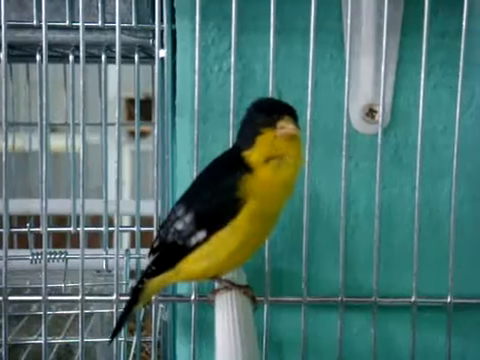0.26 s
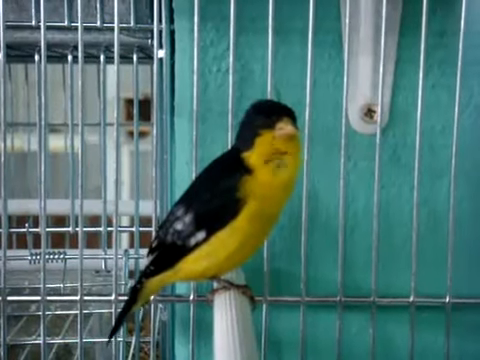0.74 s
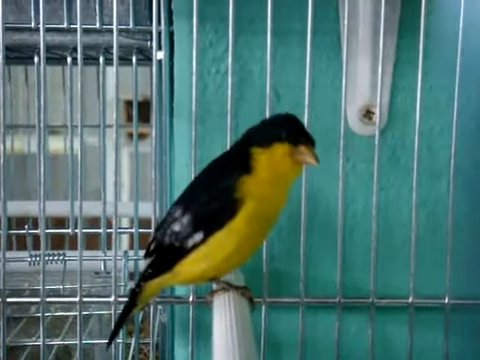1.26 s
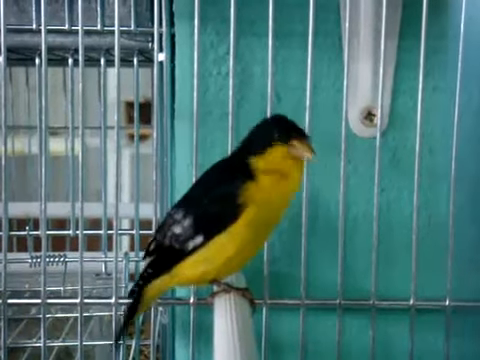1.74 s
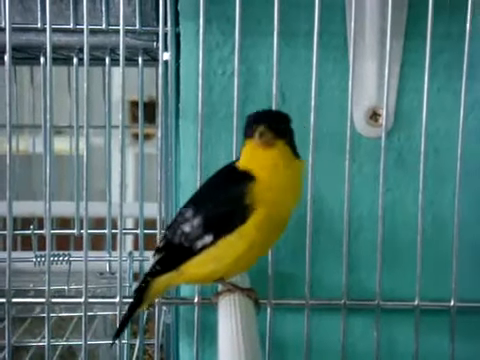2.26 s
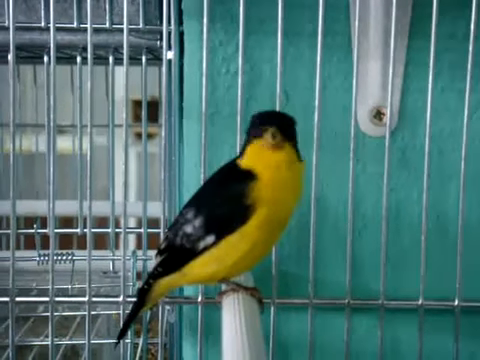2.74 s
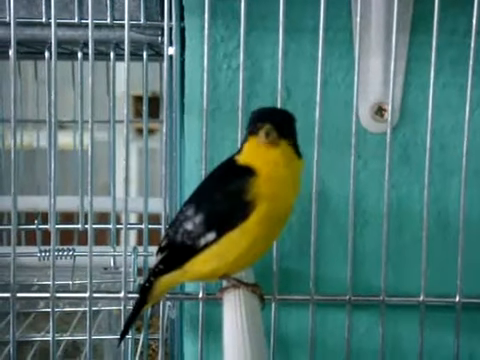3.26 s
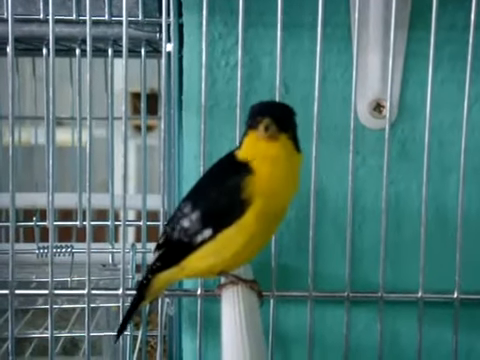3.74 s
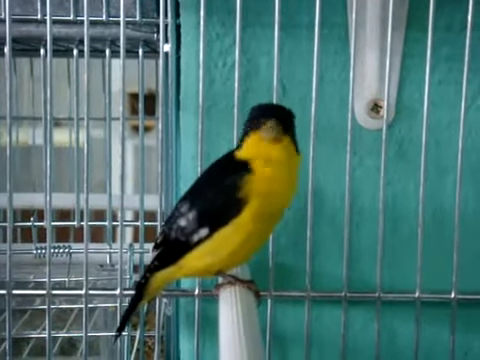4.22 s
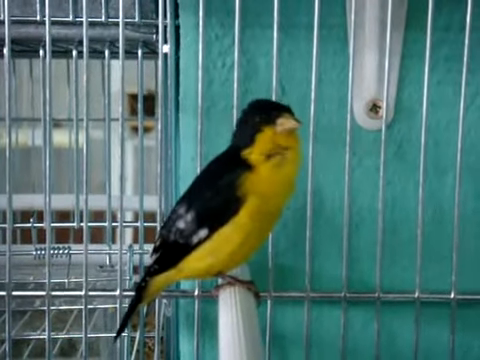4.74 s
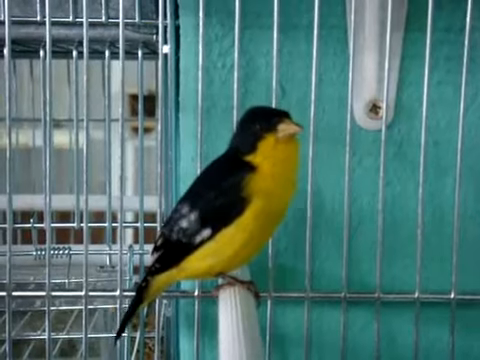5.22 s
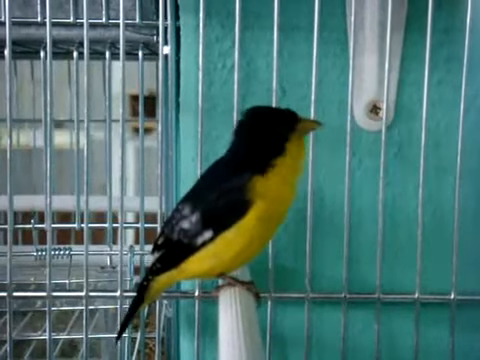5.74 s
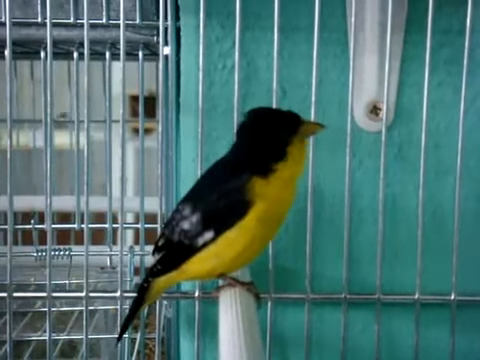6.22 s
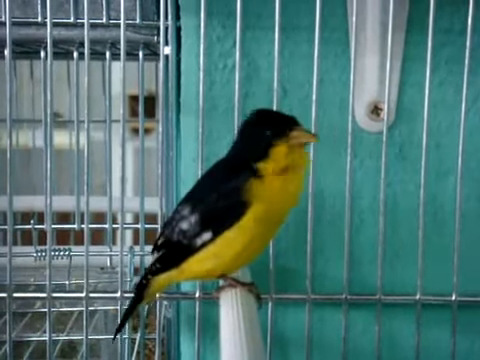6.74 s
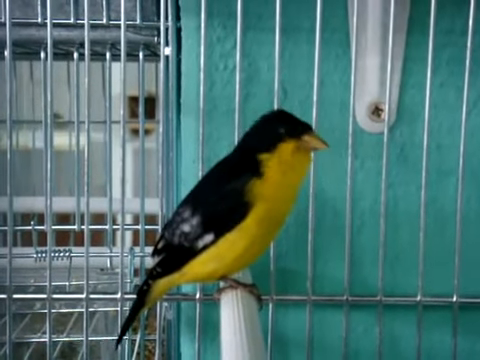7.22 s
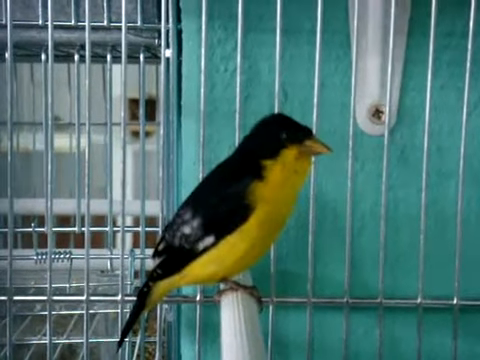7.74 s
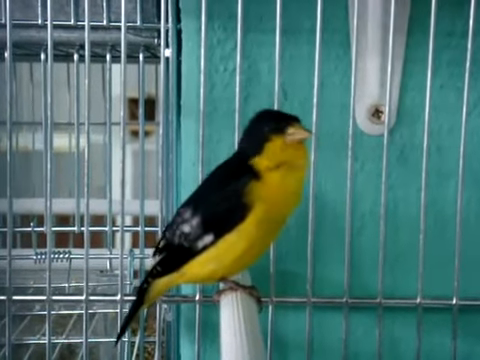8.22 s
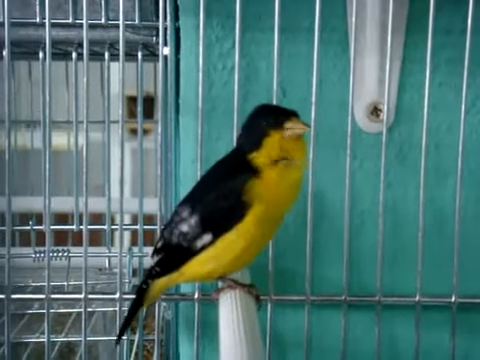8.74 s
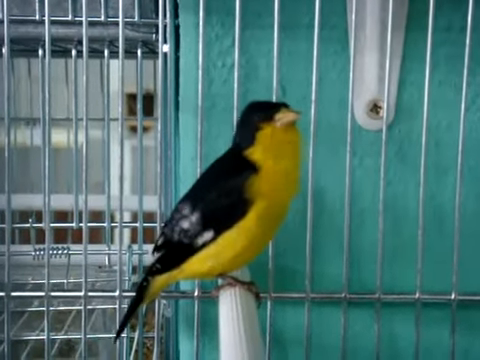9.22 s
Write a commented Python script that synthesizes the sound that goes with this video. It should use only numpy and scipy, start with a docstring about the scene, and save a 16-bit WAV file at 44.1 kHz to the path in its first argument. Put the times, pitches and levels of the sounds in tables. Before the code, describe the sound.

Indoors, a small finch sings very near and fairly dry, its loudest notes slightly overloaded. A busy first second gives way to isolated phrases around two, four and seven seconds, then a last cluster of chips and descending whistles after eight. Other birds answer faintly as reverberant tweets and trills, over uneven soft noise and a low hum.

```python
"""A caged goldfinch twitters close by: pure glides, quick flicks and two-voiced notes from the two sides of its syrinx.
Each note is a pitch curve driving a few harmonics, whose strengths follow a tone weighting.
Other birds call and trill from further off, heard mostly as the diffuse echo of a hard, ringing room.
Under them lie a steady-pitched hum and a wash of filtered noise; this background sinks and swells.
The loudest notes overload the microphone, which flattens their peaks."""
import sys
import numpy as np
from scipy import signal
from scipy.fft import rfft, irfft
from scipy.io import wavfile
from scipy.ndimage import uniform_filter1d, map_coordinates

SR = 44100
rng = np.random.default_rng(int(sys.argv[2]) if len(sys.argv) > 2 else 0)


def dump(signal):
    """Clip the signal to [-1, 1] and save it as 16-bit WAV at the path in sys.argv[1]."""
    limited = np.clip(np.atleast_2d(signal).T, -1, 1)
    pcm = np.round(limited * 32767).astype(np.int16)
    wavfile.write(sys.argv[1], SR, pcm)


N = 418068

# Levels are relative: fades, the room and the background swell act on them later.
# tone weighting of the bird voices, with the treble cut steeply above 9 kHz: f/Hz, gain/dB
VOICE_WEIGHTING = [(1400, -29), (2100, -24), (3000, -0.5), (4500, 2.5), (5800, 7.5), (7000, -3), (9000, -5),
                   (11000, -68)]
# stretches in which the close voice turns harsh: start t/s, end t/s, roughness (0 to 1)
HARSH = [(4.38, 4.43, .3), (8.68, 8.725, .3), (8.935, 8.99, .3), (9.245, 9.34, .22)]
# whistles that fall and settle; short overlaps join the parts of one whistle, rows sounding together
# are two voices: start t/s, end t/s, first f/Hz, last f/Hz, level/dB, fade/dB
WHISTLES = [(0, 0.095, 6060, 5610, -7.5, 10), (0.076, 0.206, 5730, 4170, -10, -1.5),
            (1.984, 2.208, 3990, 3850, -11, 11.5), (4.644, 4.691, 4190, 3880, -9, 7),
            (4.715, 4.773, 4820, 4430, -10, 14), (4.77, 5.047, 4070, 3680, -12.5, 10.5),
            (8.293, 8.361, 4130, 3847, -9, -13.5), (8.361, 8.453, 5200, 4530, -12, 8),
            (8.385, 8.515, 4470, 3220, -12.5, 0), (8.748, 8.862, 5160, 4370, -7, 11.5),
            (9.012, 9.118, 5080, 4360, -9.5, 6), (9.285, 9.322, 4900, 3390, -10, -8),
            (9.26, 9.332, 2687, 1780, -15, 7)]
SETTLE_POWER = 2.2  # the pitch falls fast at first, then flattens
# slurs that hold their pitch, then plunge: start t/s, end t/s, first f/Hz, last f/Hz, level/dB
SLURS = [(0.413, 0.469, 5970, 3040, -6), (0.556, .615, 5880, 2830, -6.5), (2.709, 2.755, 3810, 2070, -11)]
PLUNGE_POWER, SLUR_FADE_DB = 3.0, 7
# notes with a curved pitch: start t/s, end t/s, first f/Hz, middle f/Hz, last f/Hz, level/dB
BENDS = [(0.281, 0.313, 1440, 1723, 1460, -14.5), (0.365, .385, 3460, 2170, 3820, -14.5),
         (.506, 0.528, 3900, 2320, 4030, -17), (1.959, 1.978, 4050, 5380, 5470, -6),
         (4.626, 4.716, 4200, 4870, 4600, -15), (6.093, 6.195, 2880, 3513, 3870, -13.5),
         (9.257, 9.335, 2890, 3150, 2706, -13)]
# straight fast sweeps: start t/s, end t/s, first f/Hz, last f/Hz, level/dB
FLICKS = [(0.384, 0.4, 5560, 3660, -19), (0.4, 0.41, 5430, 3430, -17.5), (0.53, 0.534, 4960, 2590, -14),
          (0.542, 0.554, 3970, 3050, -18), (2.702, 2.712, 4410, 2130, -8.5), (7.38, 7.41, 1600, 930, -17),
          (9.25, 9.262, 2840, 5800, -15.5)]
# the long nasal call: t/s, f/Hz, level/dB
NASAL_CALL = [(3.732, 1260, -6.5), (3.75, 1700, -5.5), (3.768, 1745, -5), (3.8, 1457, -15),
              (3.84, 1430, -15), (3.88, 1256, -16)]
# both sides of the syrinx slide down together:
# start t/s, end t/s, upper voice f/Hz, interval f/Hz, level/dB, fade/dB
DUETS = [(1.895, 1.951, 5426, 700, -7.5, 17), (6.872, 6.976, 5670, 968, -6, 8),
         (7.035, 7.167, 5490, 1027, -11.5, 0.5)]
# pitch of the upper voice through the note: ratio
DUET_FALL = [0.99, 0.99, 0.96, .84, .8]
# distance of the lower voice below the upper through the note: share of the interval
DUET_SPREAD = [.7, 1.05, 0.93]
# a wave, then a climb that snaps back:
# start t/s, turn t/s, end t/s, crest f/Hz, top f/Hz, wave level/dB, climb level/dB
WARBLES = [(.656, .756, .818, 3090, 4870, -19, -7.5), (0.914, .998, 1.052, 3290, 4520, -13, -8)]
# pitch through the wave: share of the crest
WAVE = [.54, 0.99, .915, 0.702, .76]
# pitch through the climb: share of the top
CLIMB = [.6, .68, .75, .89, 1]
WAVE_FADE_DB = 7.5
LEGATO_S = 0.0074  # the wave runs on a little under the climb
SNAP_S, SNAP_HZ, SNAP_DB = 0.008, 2640, -5.5  # the drop at the end; level against the climb
# the second voice sweeps up as each warble begins
LEAD_IN_HZ, LEAD_IN_S, LEAD_IN_EARLY_S, LEAD_IN_DB, LEAD_IN_FADE_DB = [3030, 4540, 5460], 0.029, 0.0046, -17, 22
# harsh chips of several short sweeps: start t/s, end t/s, arch f/Hz, level/dB
CHIPS = [(4.384, 4.434, 3900, -12), (8.684, 8.724, 3620, -6), (8.94, 8.992, 3380, -14.5)]
# both voices sweep up, then one arches and the other drops:
# start and end (shares of the chip), pitches (ratios to the arch), level/dB against the chip
CHIP_PARTS = [(0, 0.5, [1.03, 1.36], 1.5), (0, 0.6, [1.36, 1.7], -1), (.28, .84, [.74, 1, 0.802], -0.5),
              (.62, 0.86, [1.5, .85], 1)]
BOW_DB = 3  # a close note is this much louder in its middle than at its ends, before any fade
REEDY_DB, PURE_DB = -17.5, -20.5  # overtones of close notes at 2800 Hz and at 4000 Hz, per octave
# distant tweets that rise, then drop at the end: start t/s, end t/s, reference f/Hz, level/dB
TWEETS = [(2.594, 2.715, 6570, -21), (3.149, 3.302, 6505, -23.5), (3.838, 3.955, 6370, -18.5),
          (3.947, 4.061, 8320, -24.5), (4.316, 4.39, 6330, -18.5), (5.171, 5.245, 6290, -19.5),
          (5.599, 5.713, 8270, -23.5), (6.021, 6.091, 6260, -19.5), (7.318, 7.394, 6444, -17.5),
          (7.776, 7.915, 8210, -21.5), (8.248, 8.325, 6270, -16.5), (8.842, 8.967, 6405, -21.5)]
# pitch through a tweet: share of the reference
TWEET = [.53, .82, 0.98, .6]
# distant whistles on straight glides: start t/s, end t/s, first f/Hz, last f/Hz, level/dB
FAR_WHISTLES = [(.85, 0.91, 4110, 5260, -22.5), (1.78, 2.366, 4337, 4447, -33.5),
                (2.754, 2.852, 4850, 3680, -22), (4.558, 4.62, 4016, 4010, -24.5),
                (5.035, 5.18, 3922, 3743, -18), (5.3, 5.805, 3662, 3577, -24.5),
                (5.03, 5.136, 1300, 1550, -46), (5.81, 6.457, 3602, 3187, -27.5),
                (6.492, 6.562, 2450, 3750, -25), (6.958, 7.034, 8740, 4320, -26),
                (7.67, 7.8, 3370, 2794, -44), (8.138, 8.2, 4350, 5830, -24.5)]
# distant thin high ticks, all the same short drop: start t/s
TICKS = [2.68, 6.228, 7.282, 8.13]
TICK_HZ, TICK_S, TICK_DB = [8900, 7000], 0.026, -25.5
# one long, drawn-out distant slur: t/s, f/Hz, level/dB
FAR_SLUR = [(2.911, 3386, -30), (3.0, 4173, -26.5), (3.045, 5370, -18), (3.1, 5830, -16.5),
            (3.2, 5905, -32.5), (3.35, 6060, -23), (3.432, 3760, -18.5)]
# distant buzzy trills and two low, blurred whistles (near 1.3 and 2 kHz):
# start t/s, end t/s, first f/Hz, last f/Hz, pitch swing f/Hz, level/dB
FAR_MODULATED = [(1.325, 1.607, 5470, 4900, 564, -24.5), (1.501, 1.723, 1344, 1298, 30.7, -28.5),
                 (1.583, 1.673, 4387, 4263, 1140, -21.5), (2.475, 2.734, 1974, 1955, 168, -31.5),
                 (5.781, 5.82, 4800, 3850, 1240, -20), (5.938, 6.002, 4244, 4140, 1210, -20),
                 (7.793, 7.915, 5480, 4600, 660, -29.5), (9.32, 9.502, 4047, 3620, 826, -25.5)]
# spectrum of the background noise, with the treble cut steeply near 10 kHz: f/Hz, relative level/dB
NOISE_SPECTRUM = [(30, -21), (110, -15), (180, -5), (450, 0), (1100, -7), (1900, -7), (3000, 11),
                  (5500, -3.5), (9800, -13.5), (10500, -67)]
# hum lines: f/Hz, relative level/dB
HUM = [(199.2, -50.5), (403.7, -55.5), (506.0, -52)]
# course of the background: t/s, level/dB, taken against the usual level below
BACKGROUND = [(0.03, -50.5), (0.29, -48), (1.08, -47.5), (1.34, -40), (2.18, -48), (2.47, -38.5),
              (3.2, -44), (4.62, -41.5), (4.88, -47.5), (5.57, -42.5), (6.19, -47), (7.01, -37),
              (7.14, -44.5), (8.16, -37.5), (8.45, -47.5), (8.69, -39), (8.82, -54), (9.45, -40)]
USUAL_BACKGROUND_DB = -43.5
CUTOFF_HZ = 16000


def goldfinch():
    """Syllables superpose: the close song is the sum of a few kinds of gesture."""
    return plain_notes() + duets() + warbles() + chips()


def plain_notes():
    """Frequency modulation of one voice: whistles settle, slurs plunge, bends curve and flicks sweep."""
    out = np.zeros(N)
    for start, end, from_hz, to_hz, level_db, fade_db in WHISTLES:
        remaining = (1 - progress(end - start)) ** SETTLE_POWER
        pitch = to_hz + (from_hz - to_hz) * remaining
        add(out, start, note(pitch, level_db, fade_db))
    for start, end, from_hz, to_hz, level_db in SLURS:
        fallen = progress(end - start) ** PLUNGE_POWER
        pitch = from_hz + (to_hz - from_hz) * fallen
        add(out, start, note(pitch, level_db, SLUR_FADE_DB))
    for start, end, *pitches, level_db in BENDS:
        add(out, start, note(contour(pitches, end - start), level_db))
    for start, end, *pitches, level_db in FLICKS:
        add(out, start, flick(contour(pitches, end - start), level_db))
    add(out, NASAL_CALL[0][0], note(*traced(NASAL_CALL)))
    return out


def duets():
    """Two independent oscillators: the sides of the syrinx fall side by side at different pitches."""
    out = np.zeros(N)
    for start, end, upper_hz, interval_hz, level_db, fade_db in DUETS:
        upper = upper_hz * contour(DUET_FALL, end - start)
        lower = upper - interval_hz * contour(DUET_SPREAD, end - start)
        add(out, start, note(upper, level_db, fade_db) + note(lower, level_db, fade_db))
    return out


def warbles():
    """Sweeps in succession: an upsweep leads into a soft wave, a louder climb and a snap back down."""
    out = np.zeros(N)
    for start, turn, end, crest_hz, top_hz, wave_db, climb_db in WARBLES:
        lead_in = note(contour(LEAD_IN_HZ, LEAD_IN_S), LEAD_IN_DB, LEAD_IN_FADE_DB)
        wave = note(crest_hz * contour(WAVE, turn - start + LEGATO_S), wave_db, WAVE_FADE_DB)
        climb = note(top_hz * contour(CLIMB, end - turn), climb_db)
        snap = flick(contour([top_hz, SNAP_HZ], SNAP_S), climb_db + SNAP_DB)
        add(out, start - LEAD_IN_EARLY_S, lead_in)
        add(out, start, wave)
        add(out, turn, climb)
        add(out, end - SNAP_S / 2, snap)
    return out


def chips():
    """Similarity: each chip is the same knot of short sweeps, scaled in length and pitch."""
    out = np.zeros(N)
    for start, end, arch_hz, level_db in CHIPS:
        length = end - start
        for begins, ends, ratios, part_db in CHIP_PARTS:
            pitch = arch_hz * contour(ratios, (ends - begins) * length)
            add(out, start + begins * length, note(pitch, level_db + part_db))
    return out


def note(pitch, level_db, fade_db=0):
    """Amplitude envelope of a close note: it swells and fades; low notes are reedy, high ones almost pure."""
    u = np.linspace(-1, 1, len(pitch))
    overtone_db = np.interp(pitch.mean(), [1700, 2800, 4000], [-10, REEDY_DB, PURE_DB])
    tone = syrinx(pitch, overtone_db, jitter=0.0045, shimmer_db=2.57)
    envelope_db = level_db - fade_db * u / 2 - BOW_DB * u ** 2
    return tone * from_db(envelope_db) * gate(len(pitch), attack_s=.006, release_s=.008)


def flick(pitch, level_db):
    """Strong overtones and abrupt gating: a very fast, rough sweep with hard edges."""
    tone = syrinx(pitch, overtone_db=-4.5, jitter=0.012, shimmer_db=3)
    return tone * from_db(level_db) * gate(len(pitch), attack_s=0.00022, release_s=0.0027)


def syrinx(pitch, overtone_db, jitter, shimmer_db):
    """Harmonic synthesis: an unsteady tone whose harmonics follow the tone weighting, near unit power."""
    size = len(pitch)
    phase = 2 * np.pi * np.cumsum(pitch * (1 + jitter * drift(size, rate=850))) / SR
    k = np.arange(1, 7)[:, None]  # harmonic numbers
    audible = k * pitch < SR / 2
    weights = at_hz(VOICE_WEIGHTING, k * pitch) * from_db(overtone_db * np.log2(k)) * audible
    # dividing by the total power lets the weighting shape the timbre but not the loudness
    tone = (weights * np.sin(k * phase)).sum(axis=0) / np.sqrt((weights ** 2).sum(axis=0) / 2)
    return tone * from_db(shimmer_db * drift(size, rate=270))


def gate(size, attack_s, release_s):
    """Flow control: the air valve opens and shuts along quarter sines."""
    t = np.arange(size) / SR
    opening = np.sin(np.pi / 2 * np.clip(t / attack_s, 0, 1))
    closing = np.sin(np.pi / 2 * np.clip(t[::-1] / release_s, 0, 1))
    return opening * closing


def rasp():
    """Amplitude modulation: the two sides beat irregularly, which spreads noise around each harsh tone."""
    t = np.arange(N) / SR
    roughness = sum(amount * ((t > start) & (t < end)) for start, end, amount in HARSH)
    band = signal.butter(2, [250, 1200], "band", fs=SR, output="sos")
    flutter = rms_one(signal.sosfilt(band, rng.standard_normal(N)))
    return (1 + roughness * flutter) / np.sqrt(1 + roughness ** 2)


def distant_birds():
    """Superposition of far sources: tweets, whistles, ticks, one slur and the pitch-modulated calls."""
    out = far_modulated_calls()
    for start, end, top_hz, level_db in TWEETS:
        add(out, start, far_call(top_hz * contour(TWEET, end - start), level_db))
    for start, end, *pitches, level_db in FAR_WHISTLES:
        add(out, start, far_call(contour(pitches, end - start), level_db))
    for start in TICKS:
        add(out, start, far_call(contour(TICK_HZ, TICK_S), TICK_DB))
    add(out, FAR_SLUR[0][0], far_call(*traced(FAR_SLUR)))
    return out


def far_modulated_calls():
    """Fast frequency modulation: swings about 130 times a second make trills buzz and blur low whistles."""
    out = np.zeros(N)
    for start, end, from_hz, to_hz, swing_hz, level_db in FAR_MODULATED:
        size = int((end - start) * SR)
        swing_rate_hz = 130 * (1 + 0.117 * drift(size, rate=55))
        swing = np.sin(2 * np.pi * np.cumsum(swing_rate_hz) / SR)
        pitch = np.linspace(from_hz, to_hz, size) + swing_hz * swing
        tone = syrinx(pitch, overtone_db=-21.0, jitter=0.0367, shimmer_db=5.5)
        add(out, start, tone * from_db(level_db) * np.hanning(size) ** (1 / 4))
    return out


def far_call(pitch, level_db):
    """Pitch jitter grows with the range of the slur: wide slurs are hoarse, level whistles clear."""
    jitter = 0.0047 + 0.0446 * np.ptp(pitch) / np.mean(pitch)
    tone = syrinx(pitch, overtone_db=-23.5, jitter=jitter, shimmer_db=5.0)
    return tone * from_db(level_db) * gate(len(pitch), attack_s=.008, release_s=.005)


def room(x, t60, early_db, early_t60):
    """Diffuse reverberation: a burst from the near walls, then a long tail whose treble dies sooner."""
    t = np.arange(int(1.5 * SR)) / SR
    low_pass = signal.butter(2, 6000, fs=SR, output="sos")
    high_pass = signal.butter(2, 6000, "high", fs=SR, output="sos")
    low = signal.sosfilt(low_pass, rng.standard_normal(len(t)))
    high = signal.sosfilt(high_pass, rng.standard_normal(len(t)))
    tail = low * from_db(-60 * t / t60) + high * from_db(-60 * t / (0.66 * t60))
    burst = from_db(early_db - 60 * t / early_t60) * rng.standard_normal(len(t))
    echo = (tail + burst) * (t > .002)
    return signal.fftconvolve(x, echo / np.sqrt(np.sum(echo ** 2)))[:N]  # echo of unit energy


def chatter(count):
    """Random superposition: the farthest birds twitter in short slurs, mostly low in range. Unit power."""
    out = np.zeros(N)
    for k, (when, height, slope, length) in enumerate(rng.random((count, 4))):
        size = int((0.044 + .09 * length) * SR)
        hz = 2900 * 3.2 ** (height ** 1.4)
        pitch = hz * (1 + (slope - .5) * np.linspace(-.6, .6, size))
        tone = syrinx(pitch, overtone_db=-27.0, jitter=0.0302, shimmer_db=10.5)
        start = (k + when) / count * N / SR  # one slur in each equal slot
        add(out, start, tone * np.hanning(size) * from_db(-8 * height ** 2))
    return rms_one(out)


def noise_and_hum():
    """Spectral shaping of white noise gives the wash; slightly wavering sines give the hum."""
    hz = np.arange(N // 2 + 1) * SR / N
    wash = rms_one(irfft(rfft(rng.standard_normal(N)) * at_hz(NOISE_SPECTRUM, hz), N))
    hum = np.zeros(N)
    for line_hz, db in HUM:
        phase = 2 * np.pi * np.cumsum(line_hz + 1.04 * drift(N, rate=11)) / SR
        hum += from_db(db) * np.sqrt(2) * np.sin(phase)
    return from_db(-30.5) * wash + from_db(-1.0) * hum


def progress(seconds):
    """Normalised time: runs from 0 to 1 over a note."""
    return np.linspace(0, 1, max(int(seconds * SR), 2))


def contour(values, seconds):
    """Interpolation at even spacing: a line through two, a parabola through three, a spline through more."""
    u = progress(seconds)
    if len(values) > 3:
        return glide(values, len(u))
    degree = len(values) - 1
    return np.polyval(np.polyfit(np.linspace(0, 1, len(values)), values, degree), u)


def glide(values, size):
    """Cubic interpolation: a smooth curve through evenly spaced values."""
    v = np.asarray(values, float)
    v = np.r_[2 * v[0] - v[1], v, 2 * v[-1] - v[-2]]  # extend both ends in a straight line
    return map_coordinates(v, [np.linspace(1, len(v) - 2, size)], order=3, mode="nearest")


def traced(curve):
    """Linear interpolation in time: smoothed pitch and plain level at every sample of a long call."""
    s, hz, db = np.transpose(curve)
    t = np.arange(s[0], s[-1], 1 / SR)
    pitch = uniform_filter1d(np.interp(t, s, hz), size=500, mode="nearest")
    return pitch, np.interp(t, s, db)


def drift(size, rate):
    """Slow chance: normal random values, `rate` a second, joined by straight lines."""
    steps = np.arange(size) * rate / SR
    return np.interp(steps, np.arange(4096), rng.standard_normal(4096))


def at_hz(points, hz):
    """Frequency response: gain at these frequencies, with dB interpolated over log frequency."""
    f, db = np.transpose(points)
    return from_db(np.interp(np.log(np.maximum(hz, 1)), np.log(f), db))


def from_db(db):
    """Logarithmic level: decibels to amplitude gain."""
    return 10 ** (np.asarray(db) / 20)


def rms_one(x):
    """Normalisation: scale to unit power."""
    return x / np.sqrt(np.mean(x ** 2) + 1e-20)


def add(out, start, sound):
    """Superposition: mix a sound in at its start in seconds."""
    i = max(int(start * SR), 0)
    out[i:i + len(sound)] += sound[:max(N - i, 0)]


def scene():
    """Direct and reverberant sound: the close bird is nearly dry, the distant ones mostly echo."""
    swell_db = np.interp(np.arange(N) / SR, *np.transpose(BACKGROUND)) - USUAL_BACKGROUND_DB
    close, far = goldfinch() * rasp(), distant_birds()
    close = close + from_db(-19.5) * room(close, t60=0.69, early_db=10.5, early_t60=0.033)
    far = from_db(-3) * far + from_db(5.5) * room(far, t60=0.85, early_db=7.5, early_t60=0.11)
    twitter = room(chatter(count=200), t60=.8, early_db=0, early_t60=.16)
    background = noise_and_hum() + from_db(-27) * twitter
    # the distant calls follow the swell of the background only in part
    mix = close + far * from_db(0.41 * swell_db) + background * from_db(swell_db)
    return mix[None]


def record(dry):
    """Saturation and low-pass filtering: peaks near full scale are flattened, the top is cut."""
    clipped = dry / (1 + dry ** 10) ** (1 / 10)
    low_pass = signal.cheby2(12, 70, CUTOFF_HZ, fs=SR, output="sos")
    return signal.sosfilt(low_pass, clipped)


dry = scene()
out = record(dry)
dump(out)
```